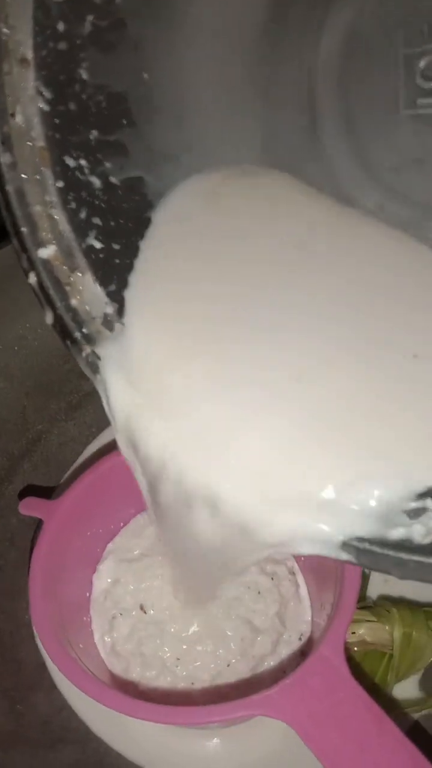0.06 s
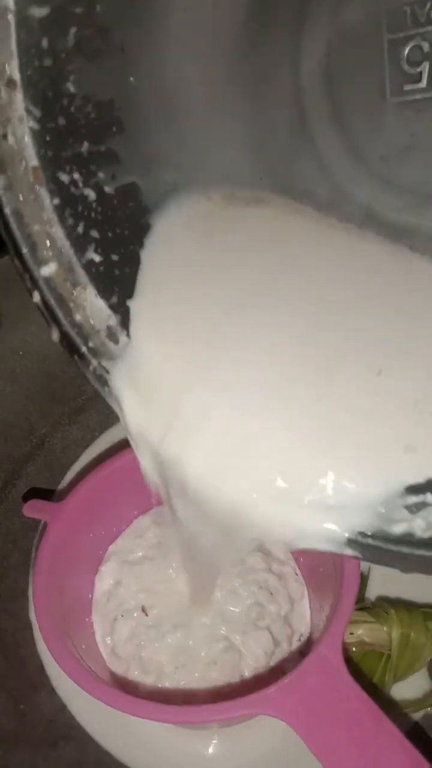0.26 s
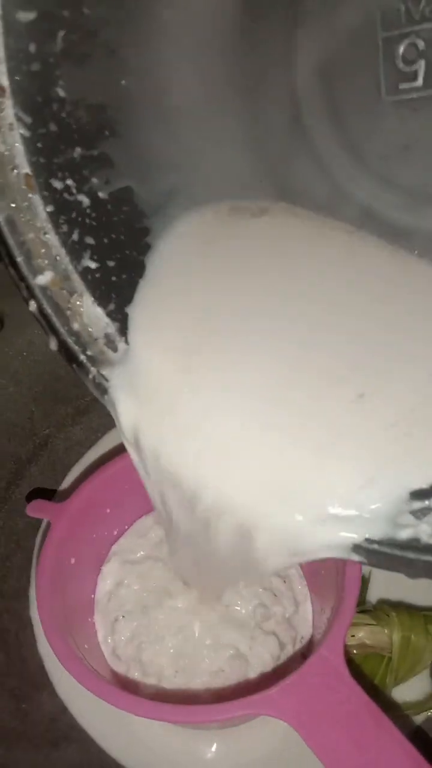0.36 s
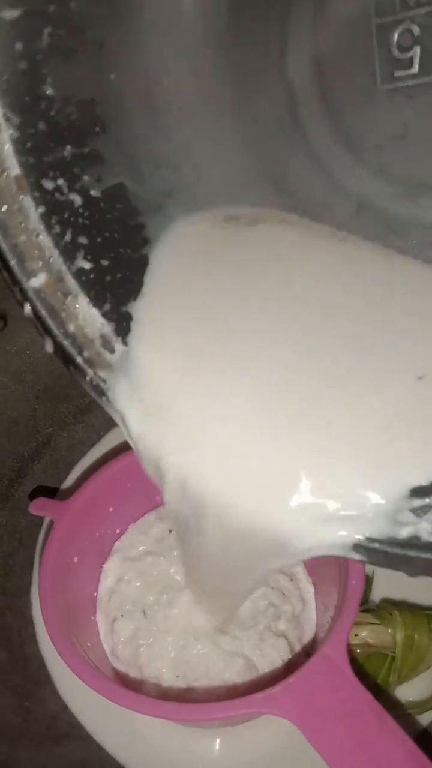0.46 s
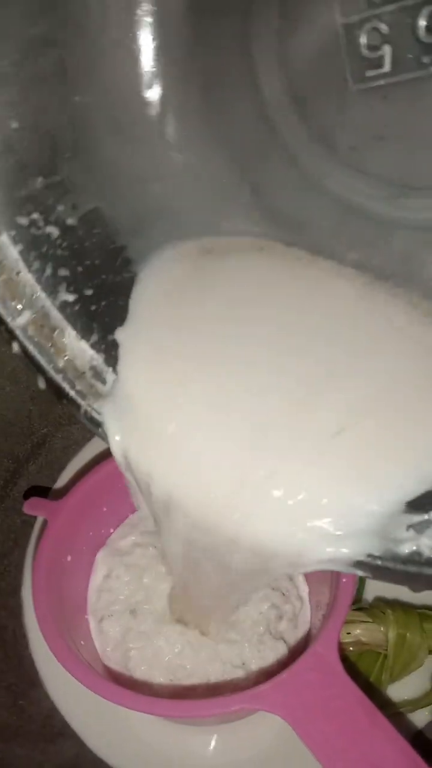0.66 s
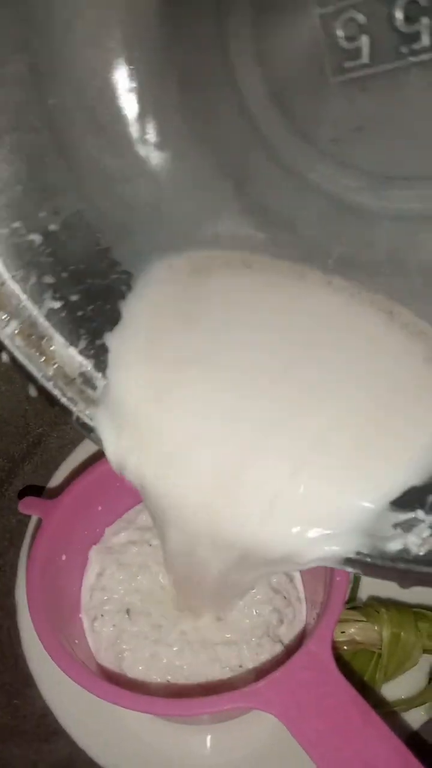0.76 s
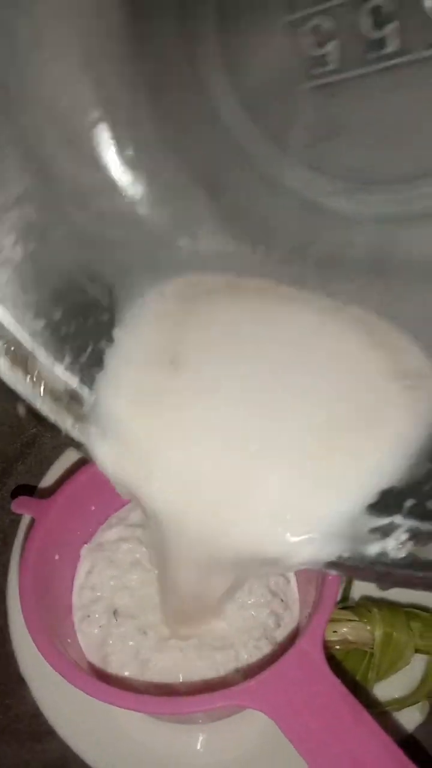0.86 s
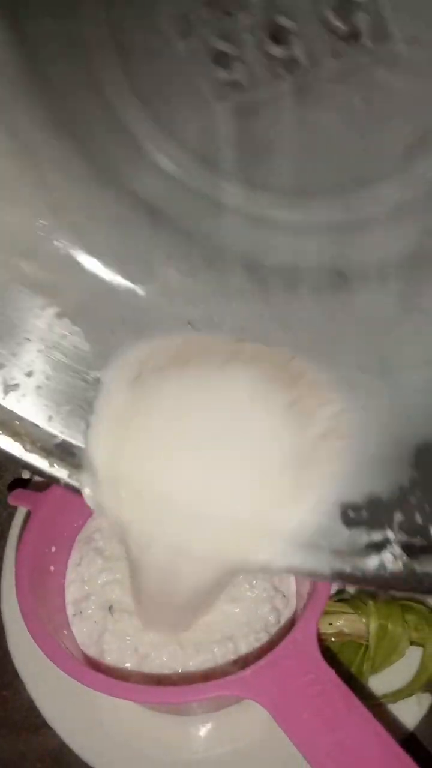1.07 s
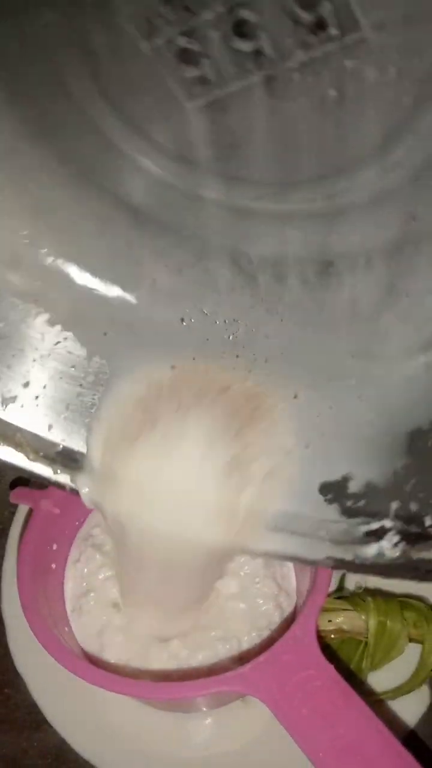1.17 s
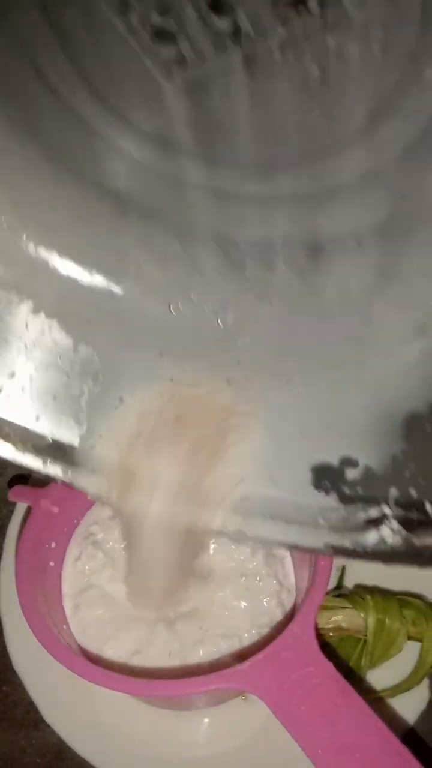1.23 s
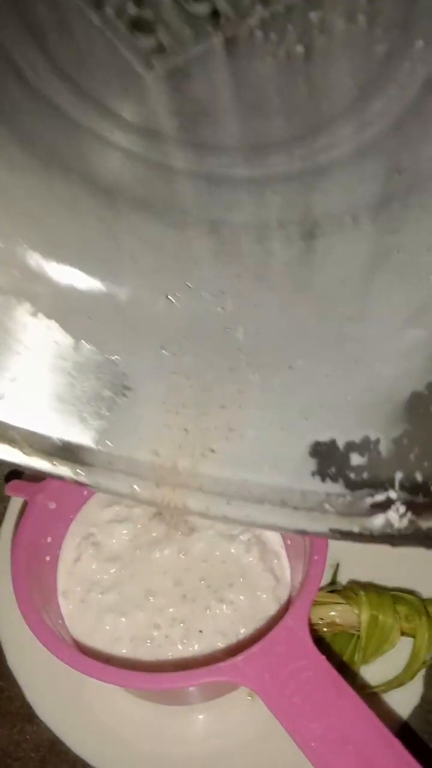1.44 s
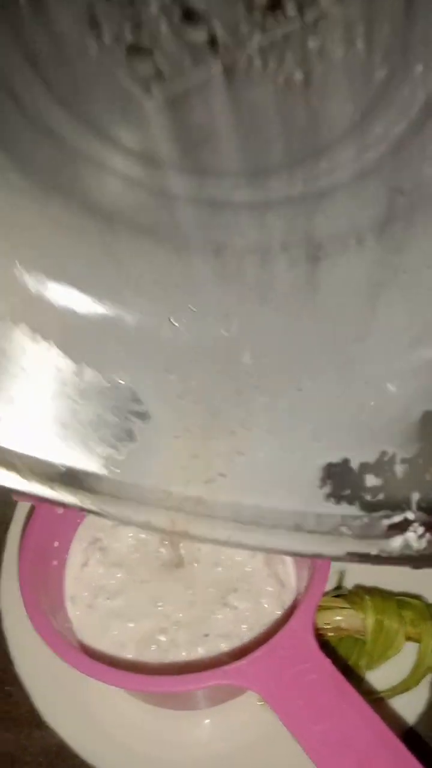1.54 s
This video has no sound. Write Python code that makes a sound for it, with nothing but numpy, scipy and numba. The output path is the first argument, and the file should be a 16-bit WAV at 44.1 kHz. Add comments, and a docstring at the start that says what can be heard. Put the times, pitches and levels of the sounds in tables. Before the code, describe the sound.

Close pour of creamy liquid through a strainer, quiet and trickling at first, then a burst of bright splashes and ringing bubbles, fading to drips over faint low buzz and hiss in a small dry room.

```python
"""Thick liquid poured into a pan

Thick liquid pours through a plastic strainer into a pan close to a phone. Swarms of damped sines make
the fizz, gurgle and bubbles; splashes, chirps and brief tones are placed one by one; froth ticks are noise.
A wavering sine, rising overall, is the air in the filling pan; bubbles also ring the metal.
Uneven pulses give a low buzz (perhaps a far engine) that comes and goes twice, over rumble and kitchen hiss."""
import sys
import numpy as np
from scipy import signal
from scipy.fft import rfft, irfft
from scipy.io import wavfile
from scipy.ndimage import uniform_filter1d
from numba import njit

SR = 44100
rng = np.random.default_rng(int(sys.argv[2]) if len(sys.argv) > 2 else 0)


def waveform_to_disk(signal):
    """Save audio, clipped to [-1, 1], as 16-bit WAV at the path in sys.argv[1]."""
    frames = np.transpose(np.atleast_2d(signal))
    scaled = np.clip(frames, -1, 1) * 32767
    samples = np.round(scaled).astype(np.int16)
    wavfile.write(sys.argv[1], SR, samples)


def natural_amplitude(level_db):
    """Convert a level in decibels to a linear amplitude factor, elementwise."""
    exponent = np.asarray(level_db, float) / 20
    return 10 ** exponent


N = 70560  # samples


def curve(rows, col, off=None):
    """One table column, joined by straight lines in time; `off` is its value outside the table."""
    rows = np.array(rows, float)
    return np.interp(np.arange(N) / SR, rows[:, 0], rows[:, col], left=off, right=off)


def unit(x):
    """Scale to rms 1."""
    return x / np.sqrt(np.mean(x ** 2))


def smooth_noise(shape, size):
    """Slow random waver of rms 1: noise averaged twice over `size` samples."""
    noise = rng.standard_normal(shape)
    return unit(uniform_filter1d(uniform_filter1d(noise, size=size), size=size))


@njit
def svf(x, hz, width):
    """State-variable band-pass with moving centre, gain 1 there."""
    y, b, l = np.empty(len(x)), 0., 0.
    for i in range(len(x)):
        g, k = np.tan(np.pi * hz[i] / SR), width / hz[i]
        v = (b + g * (x[i] - l)) / (1 + g * (g + k))
        b, l, y[i] = 2 * v - b, l + 2 * g * v, k * v
    return y


@njit
def grains(out, at, hz, cycles, size, glide, rise):
    """Bubbles as damped sines: swell 1/e in `rise` cycles, fade 1/e in `cycles`, glide upward."""
    for j in range(len(at)):
        n, phase = cycles[j] * SR / hz[j], 0.
        for i in range(min(int(5 * n), len(out) - at[j])):
            phase += 2 * np.pi * hz[j] / SR * (1 + glide * i / n)
            swell = 1 - np.exp(-i * hz[j] / SR / rise)
            out[at[j] + i] += size[j] * np.exp(-i / n) * swell * np.sin(phase)
    return out


def band(x, lo_hz, hi_hz):
    """Steep band-pass."""
    return signal.sosfilt(signal.butter(6, [lo_hz, min(hi_hz, .45 * SR)], "band", fs=SR, output="sos"), x)


def swarm(count, centre_hz, spread, cycles, scatter_db, glide):
    """Bubbles at random times around a centre pitch, with skewed random sizes; rms 1."""
    c = rng.random((count, 4))
    at = (c[:, 0] * (N - 1)).astype(np.int64)
    hz = centre_hz[at] * np.exp(spread * (2 * c[:, 1] - 1))
    size = natural_amplitude(scatter_db * np.minimum(-np.log(1 - c[:, 3]), 4))
    return unit(grains(np.zeros(N), at, hz, cycles * (.5 + c[:, 2]), size, glide, 0.64))


def played(rows, cycles, glide, rise):
    """Single bubbles, one per table row."""
    r = np.array(rows, float)
    at = (r[:, 0] * SR).astype(np.int64)
    return grains(np.zeros(N), at, r[:, 2].copy(), cycles + 0 * r[:, 0], natural_amplitude(r[:, 1]), glide, rise)


def kitchen():
    """Faint steady room hiss: noise shaped by a fixed spectrum."""
    # (frequency [Hz], relative density [dB per Hz])
    spectrum = np.array([(24, -77), (40, -11), (156, -9.5), (845, -32), (1530, -1), (2200, -16),
                         (2600, -20), (4130, -21.5), (6300, -10), (15000, -118.5)])
    level_db = -61
    hz = np.fft.rfftfreq(N, 1 / SR) + 1
    gain_db = np.interp(np.log(hz), np.log(spectrum[:, 0]), spectrum[:, 1])
    return natural_amplitude(level_db) * unit(irfft(rfft(rng.standard_normal(N)) * natural_amplitude(gain_db), N))


def fizz():
    """Tiny bubbles near 5-6 kHz, a thin hiss above and fine crackle at the top, each a banded swarm."""
    # small bubbles: (time [s], level [dB])
    main_levels = [(0.0, -43.5), (0.022, -50.5), (0.218, -50), (0.236, -42.5), (0.266, -46.5),
                   (0.276, -43.5), (0.316, -46), (0.342, -45), (0.392, -46), (0.422, -45.5), (0.538, -45.5),
                   (0.548, -43.5), (0.575, -45.5), (0.664, -52), (0.667, -34.5), (0.73, -43.5),
                   (0.784, -35), (0.792, -46), (0.795, -36), (0.814, -37.5), (0.824, -42), (0.85, -45),
                   (0.878, -40), (0.882, -39), (0.914, -45.5), (0.922, -39), (0.938, -44), (0.944, -37),
                   (0.952, -41.5), (1.002, -36), (1.1, -42), (1.114, -33), (1.122, -39.5), (1.22, -49.5),
                   (1.234, -41), (1.318, -48), (1.332, -41.5), (1.368, -49), (1.416, -47), (1.452, -52.5),
                   (1.6, -57.5)]
    # (time [s], thin hiss level [dB], top crackle level [dB])
    high_levels = [(0.0, -61, -71), (0.14, -62, -70), (0.276, -65, -59), (0.375, -63.5, -68),
                   (0.466, -61.5, -54), (0.664, -62, -72), (0.668, -53, -56), (0.722, -61, -61),
                   (0.756, -53, -49.5), (0.792, -58, -52), (0.797, -47, -50), (0.836, -63, -61),
                   (0.872, -59, -68), (0.882, -55, -44), (0.908, -57, -52), (1.114, -50, -48.5),
                   (1.224, -62, -64), (1.23, -53, -58), (1.354, -62, -64), (1.403, -63, -81),
                   (1.407, -48.5, -62), (1.426, -62.5, -62), (1.6, -67, -86)]
    flat = np.ones(N)
    main = swarm(count=3000, centre_hz=5600 * flat, spread=0.2, cycles=10.8, scatter_db=2.0, glide=0.0081)
    air = swarm(count=9000, centre_hz=9000 * flat, spread=0.29, cycles=5.0, scatter_db=-3.5, glide=0.019)
    top = swarm(count=5000, centre_hz=14100 * flat, spread=0.18, cycles=2.0, scatter_db=2.0, glide=0.03)
    out = natural_amplitude(curve(main_levels, 1)) * unit(band(main, 4550, 7300))
    out += natural_amplitude(curve(high_levels, 1)) * unit(band(air, 7000, 10650))
    return out + natural_amplitude(curve(high_levels, 2)) * unit(band(top, 10750, 15800))


def bubbles():
    """Middle-sized bubbles, and the metal pan's modes rung by a swarm of short ones."""
    # (time [s], level [dB], centre pitch [Hz])
    rows = [(0.0, -64, 2850), (0.248, -61.5, 3330), (0.288, -62.5, 2620), (0.458, -62, 3700),
            (0.484, -48, 3800), (0.498, -61, 3620), (0.574, -57.5, 3770), (0.632, -65.5, 3210),
            (0.778, -58.5, 3386), (0.796, -45, 2880), (0.846, -60, 3270), (0.93, -56, 3710),
            (0.944, -59, 3144), (0.962, -47.5, 2953), (0.998, -43, 2850), (1.006, -38.5, 2876),
            (1.108, -44, 3544), (1.162, -54.5, 2984), (1.176, -47.5, 2695), (1.224, -54, 3020),
            (1.234, -44, 2813), (1.28, -50, 3503), (1.345, -53, 3615), (1.375, -68, 3052), (1.6, -68, 3200)]
    # modes of the metal pan: (frequency [Hz])
    modes_hz = [2278, 2850, 3100, 3547, 3876]
    mode_width_hz, ring_db = 59., -3  # ring relative to the bubbles
    centre_hz = curve(rows, 2)
    mid = swarm(count=1100, centre_hz=centre_hz, spread=0.2785, cycles=16.6, scatter_db=2.0, glide=0.01)
    stream = swarm(count=500, centre_hz=centre_hz, spread=0.3, cycles=1.25, scatter_db=3.0, glide=0.011)
    ring = unit(sum(svf(stream, hz + np.zeros(N), mode_width_hz) for hz in modes_hz))
    return natural_amplitude(curve(rows, 1)) * (mid + natural_amplitude(ring_db) * ring)


def gurgle():
    """Faint gurgle: larger bubbles, so lower in pitch, in a low and a deep swarm."""
    # (time [s], low part level [dB], deep part relative to low [dB])
    rows = [(0.0, -57.5, -10.5), (0.146, -69.5, 3), (0.27, -55, 1.5), (0.432, -59, -14.5),
            (0.476, -48.5, -23), (0.56, -68, 0.5), (0.716, -63.5, -11.5), (0.756, -66, -3),
            (0.842, -59, -5), (1.6, -67.5, -4.5)]
    flat = np.ones(N)
    low = swarm(count=600, centre_hz=830 * flat, spread=0.24, cycles=1.87, scatter_db=2.0, glide=0.0092)
    deep = swarm(count=300, centre_hz=350 * flat, spread=0.367, cycles=1.9, scatter_db=2.5, glide=0.056)
    return natural_amplitude(curve(rows, 1)) * (low + natural_amplitude(curve(rows, 2)) * deep)


def pan_air():
    """The air in the pan rings a wavering note in blips; drops add a broad ring around it."""
    # note: (time [s], level [dB])
    note_levels = [(0.0, -62), (0.052, -61), (0.12, -77), (0.204, -46.5), (0.236, -69), (0.254, -46),
                   (0.31, -58), (0.335, -41.5), (0.41, -49), (0.636, -56), (0.698, -57), (0.72, -39),
                   (0.74, -52), (0.828, -49), (0.86, -57), (0.89, -46), (0.944, -82), (0.966, -50),
                   (0.998, -55), (1.016, -77), (1.038, -66), (1.114, -41), (1.154, -69), (1.18, -41.5),
                   (1.22, -53), (1.246, -42.5), (1.264, -42), (1.288, -61.5), (1.354, -77), (1.438, -58.5),
                   (1.5, -81), (1.6, -60)]
    # broad ring: (time [s], level [dB])
    ring_levels = [(0.0, -56.5), (0.16, -61.5), (0.23, -52), (0.248, -54.5), (0.726, -59), (0.77, -47),
                   (0.94, -55), (1.046, -43.5), (1.078, -49), (1.118, -45.5), (1.148, -56.5), (1.256, -53),
                   (1.288, -57.5), (1.6, -64.5)]
    # note: (time [s], mean pitch [Hz])
    pitch = [(0.15, 1243), (0.45, 1256), (0.6, 1282), (0.8, 1292), (0.95, 1388), (1.3, 1358), (1.6, 1403)]
    blip_db, waver = 2.6, 0.00995  # rms level waver; rms pitch waver as a fraction
    drops = swarm(count=2500, centre_hz=1500 * np.ones(N), spread=0.19, cycles=1.0, scatter_db=2.5, glide=0.021)
    shake = smooth_noise((2, N), 250)
    phase = 2 * np.pi * np.cumsum(curve(pitch, 1) * (1 + waver * shake[1])) / SR
    note = natural_amplitude(blip_db * shake[0]) * np.sin(phase)
    ring = unit(band(drops, 1040, 2040))
    return natural_amplitude(curve(note_levels, 1)) * unit(note) + natural_amplitude(curve(ring_levels, 1)) * ring


def buzz():
    """Low buzz: two sine partials, and uneven pulses through three resonances for the upper ones."""
    # one table per appearance: (time [s], mean pitch [Hz], first partial level [dB],
    # second partial relative to first [dB], upper partials relative to first [dB])
    appearances = [
        [(0.0, 67.6, -96, 18, 33), (0.04, 71, -62, -14, -18), (0.066, 70.92, -46, -14, -13),
         (0.142, 66.67, -53.5, 11.5, 7), (0.176, 66.15, -51.5, -44, 4.5), (0.228, 68.6, -48, -3.5, 1),
         (0.286, 66.45, -50.5, 6.5, 7), (0.4, 66.5, -50.5, -7, -18), (0.466, 66.36, -51.5, -6, -7),
         (0.51, 69.5, -81, -18, -3), (0.54, 73.2, -95.5, 9, 45.5)],
        [(0.72, 81.63, -72, 2, 0), (0.758, 78.2, -54.5, -25, -13), (0.774, 79.7, -56, -8, -34),
         (0.806, 76.1, -50, 3, -3), (0.83, 79.9, -54, -13, -8), (0.86, 80.5, -56.5, -6, -24),
         (0.896, 82.3, -53.5, -26, 0), (0.934, 79.2, -61, -8, -8), (0.946, 82.9, -67, 6, -15),
         (0.964, 77.8, -82, -4, 7), (0.98, 76.7, -92, 25, 43)],
    ]
    # fixed resonances: (frequency [Hz], width of the narrower of two stages [Hz], gain [dB])
    body = [(291, 58, -1.5), (509.5, 70, 9.5)]
    # moving upper resonance: (time [s], frequency [Hz])
    top = [(.17, 705), (.26, 790), (.33, 693), (.4, 880)]
    waver_db, pitch_waver, pulse_scatter_db = 4.5, 0.03305, 2.1
    resonances = body + [(curve(top, 1), 50, 9.5)]
    out = np.zeros(N)
    for rows in appearances:
        wobble = unit(uniform_filter1d(rng.standard_normal((3, N)), size=700))
        phase = np.cumsum(curve(rows, 1) * (1 + pitch_waver * wobble[0])) / SR  # cycles
        first = natural_amplitude(waver_db * wobble[1]) * np.sin(2 * np.pi * phase)
        second = natural_amplitude(waver_db * wobble[2] + curve(rows, 3)) * np.sin(4 * np.pi * phase + 0.3)
        whole = np.floor(phase).astype(int)
        # one pulse a cycle, each of random height, plus a little noise
        pulses = np.diff(whole, prepend=0) * natural_amplitude(pulse_scatter_db * rng.standard_normal(N // 100)[whole])
        pulses = pulses + .012 * rng.standard_normal(N)
        upper = np.zeros(N)
        for k, (f, width_hz, db) in enumerate(resonances):
            hz = f + np.zeros(N)
            # alternating signs
            upper += (-1) ** k * natural_amplitude(db) * svf(svf(pulses, hz, 2. * width_hz), hz, 1. * width_hz)
        out += natural_amplitude(curve(rows, 2, -120)) * (first + second + natural_amplitude(curve(rows, 4)) * unit(upper))
    return out


def froth_ticks():
    """Bursting froth: short broadband ticks, noise in three bands with instant attack and 1/e fade."""
    # (time [s], level ahead of the band gains [dB])
    ticks = [(0.074, -42), (0.1005, -40), (0.1764, -37.5), (0.205, -32.5), (0.2426, -37), (0.2781, -34.5),
             (0.3257, -38.5), (0.3948, -41), (0.4392, -44), (0.481, -33.5), (0.5224, -36), (0.6664, -36),
             (0.6835, -34), (0.7308, -46), (0.7528, -34), (0.794, -18.5), (0.817, -35), (0.8808, -34),
             (0.94, -44), (0.9656, -30), (0.9971, -28), (1.044, -27), (1.0818, -28.5), (1.2303, -33),
             (1.3051, -45), (1.3269, -37), (1.4045, -38), (1.4326, -50), (1.4575, -43)]
    fade_s = 0.0054
    t, envelope = np.arange(N) / SR, np.zeros(N)
    for start_s, db in ticks:
        envelope += natural_amplitude(db) * (t >= start_s) * np.exp(-np.abs(t - start_s) / fade_s)
    noise = rng.standard_normal(N)
    colour = natural_amplitude(-9.0) * unit(band(noise, 10760, 20400))
    colour += natural_amplitude(-12.0) * unit(band(noise, 5040, 8040))
    colour += natural_amplitude(-21.5) * unit(band(noise, 7550, 11040))
    return envelope * colour


def brief_tones():
    """Brief wavering sines under a rounded swell: mostly air pockets; the 290 Hz one is part of the buzz."""
    # (start [s], mean peak level [dB], mean pitch [Hz], length [s])
    tones = [(0.17, -48.5, 1671, 0.12), (.35, -54.5, 850, 0.054), (0.464, -44, 830, 0.026),
             (0.4555, -44.5, 697, 0.055), (0.457, -50, 491, 0.095), (0.692, -53, 1200, 0.05),
             (0.757, -34, 1280, 0.015), (0.771, -37, 1270, 0.0115), (0.791, -31, 1275, 0.016),
             (0.817, -29, 1200, 0.014), (0.829, -33, 1500, 0.0088), (0.838, -41, 1150, 0.011),
             (0.222, -50.5, 290, .12), (0.809, -50.5, 498.6, 0.045), (0.878, -50, 500, 0.054),
             (0.868, -41.5, 1142, 0.039), (0.88, -42, 1040, 0.032), (0.966, -43.5, 842, 0.033),
             (0.955, -49.5, 303, 0.07), (0.982, -53, 1600, 0.058), (1.3, -48, 2280, 0.021),
             (1.033, -52, 1950, 0.11), (0.755, -42.5, 1650, 0.05), (1.295, -57.5, 701, 0.13),
             (1.425, -64, 340, 0.052)]
    waver_db, pitch_waver = 2.9, 0.0139
    t, out = np.arange(N) / SR, np.zeros(N)
    for start_s, db, hz, length_s in tones:
        shake = smooth_noise(N, 180)
        swell = np.sin(np.pi * np.clip((t - start_s) / length_s, 0, 1) ** 0.74)
        tone = np.sin(2 * np.pi * hz * np.cumsum(1 + pitch_waver * shake) / SR)
        out += natural_amplitude(db + waver_db * shake) * swell * tone
    return out


def splashes():
    """Loud splashes: each is a bright bubble trailed by two weaker ones."""
    # (time [s], level ahead of swell and fade [dB], starting pitch [Hz])
    rows = np.array([(0.2312, -25.5, 5200), (0.2743, -23, 6294), (0.3381, -24, 4900), (0.3487, -27.5, 4580),
                     (0.4217, -25.5, 5100), (0.4742, -23.5, 5400), (0.544, -20, 4706), (0.546, -24, 5320),
                     (0.554, -33, 4100), (0.6675, -17.5, 5250), (0.6834, -18, 4850), (0.739, -23, 5480),
                     (0.7532, -22.5, 6510), (0.7598, -23, 5150), (0.772, -14.5, 5330), (0.7744, -18, 5180),
                     (0.778, -14.5, 5570), (0.7814, -16.5, 5600), (0.7946, -10.5, 5010),
                     (0.7975, -17, 4980), (0.8032, -17, 5400), (0.82, -19.5, 5230), (0.8284, -25, 5060),
                     (0.8804, -18, 5280), (0.918, -17.5, 5480), (0.9406, -18.5, 5210), (0.963, -22, 5150),
                     (0.9983, -19.5, 5610), (1.0112, -20, 5150), (1.018, -30, 5480), (1.0319, -15.5, 6700),
                     (1.0434, -24, 5450), (1.1109, -24, 5280), (1.232, -19.5, 6130), (1.276, -24, 5390),
                     (1.3299, -27, 4890), (1.4056, -26, 5734)])
    out = played(rows, cycles=9.0, glide=0.0078, rise=4.8)
    c = rng.random((len(rows), 4))
    for k in (0, 2):
        delay_s, detune_hz = .002 + .007 * c[:, k], 900. * (c[:, k + 1] - .5)
        trail = rows + np.c_[delay_s, -6.5 + 0 * delay_s, detune_hz]
        out = out + played(trail, cycles=7.8, glide=0.011, rise=3.2)
    return out


def rumble():
    """Low rumble: band-passed noise with a moving level."""
    # (time [s], level [dB])
    levels = [(0.5, -87), (0.588, -67.5), (0.768, -64), (0.812, -53), (1.062, -78.5), (1.096, -61.5),
              (1.452, -78.5), (1.6, -63.5)]
    return natural_amplitude(curve(levels, 1, -92)) * unit(band(rng.standard_normal(N), 116, 181.5))


def chirps():
    """Larger single bubbles that ring on as damped, slightly rising sines."""
    # (time [s], level ahead of swell and fade [dB], starting pitch [Hz])
    rows = [(0.6818, -44, 3100), (0.793, -33.5, 3360), (0.9403, -32.5, 3850), (0.9724, -27.5, 2780),
            (0.9929, -17, 2845), (1.0047, -30, 3100), (1.012, -33, 2800), (1.0174, -32.5, 2854),
            (1.0314, -34, 2872), (1.0448, -30, 2920), (1.0514, -26.5, 3590), (1.1124, -32, 3530),
            (1.1747, -35, 3004), (1.2331, -30.5, 2754), (1.2765, -32, 3386)]
    return played(rows, cycles=17.9, glide=0.0076, rise=3.4)


def room(x):
    """Adds a short room tail: convolution with exponentially fading noise."""
    wet_db, t60_s = -11, 0.15
    t = np.arange(SR // 4) / SR
    tail = rng.standard_normal(len(t)) * np.exp(-np.log(1000) * t / t60_s) * (t > .002)
    return x + natural_amplitude(wet_db) * signal.fftconvolve(x, tail / np.linalg.norm(tail))[:N]


def scene():
    """Liquid and brief tones with a short room tail; buzz(), rumble and hiss without one."""
    near = fizz() + bubbles() + gurgle() + pan_air() + froth_ticks() + brief_tones() + splashes() + chirps()
    return (room(near) + kitchen() + buzz() + rumble())[None]


def low_pass(x):
    """Removes everything above the highest recorded frequency."""
    return signal.sosfilt(signal.butter(12, 16380, fs=SR, output="sos"), x)


def record(dry):
    """The phone cuts the very bottom and top."""
    mix = signal.sosfilt(signal.butter(4, 56, "high", fs=SR, output="sos"), dry)
    mix = signal.sosfilt(signal.ellip(8, .3, 60, 15750, fs=SR, output="sos"), mix)
    return low_pass(mix)


dry = scene()
out = record(dry)
waveform_to_disk(out)
```